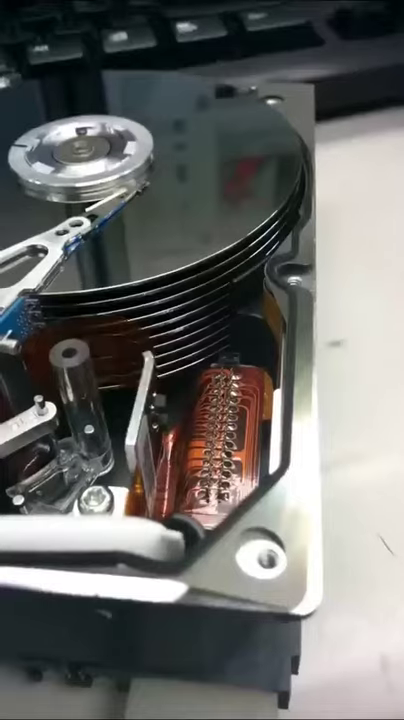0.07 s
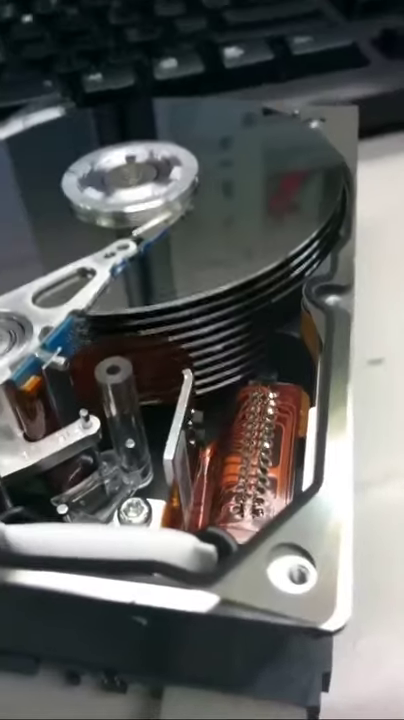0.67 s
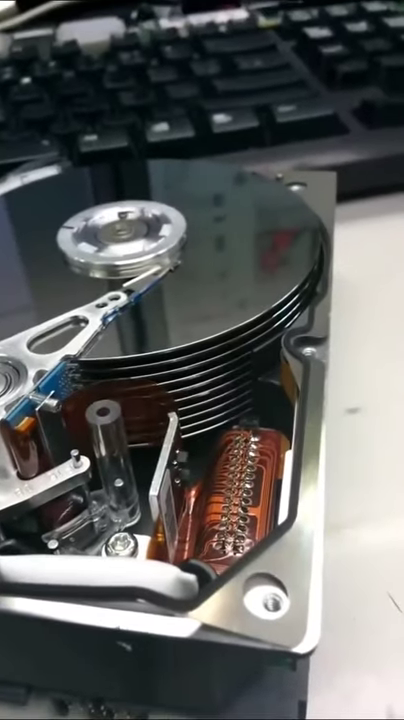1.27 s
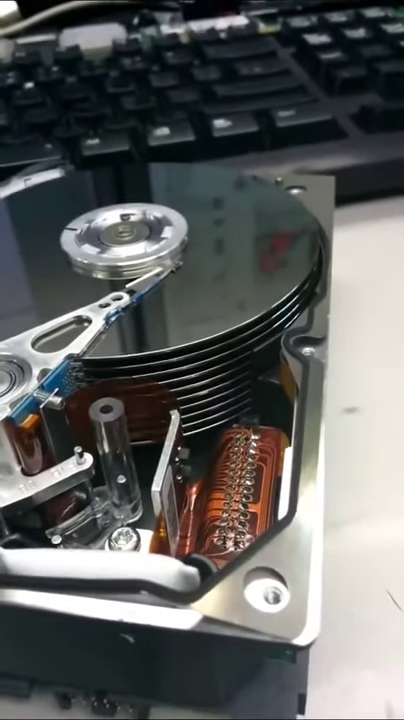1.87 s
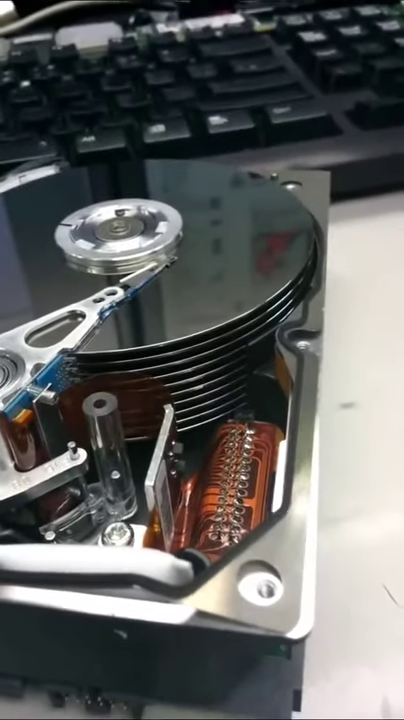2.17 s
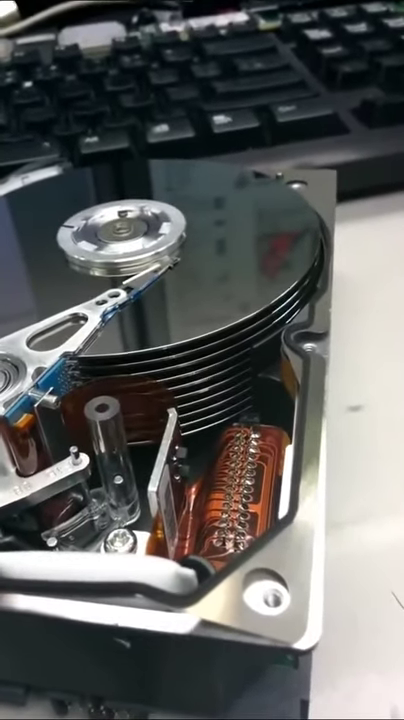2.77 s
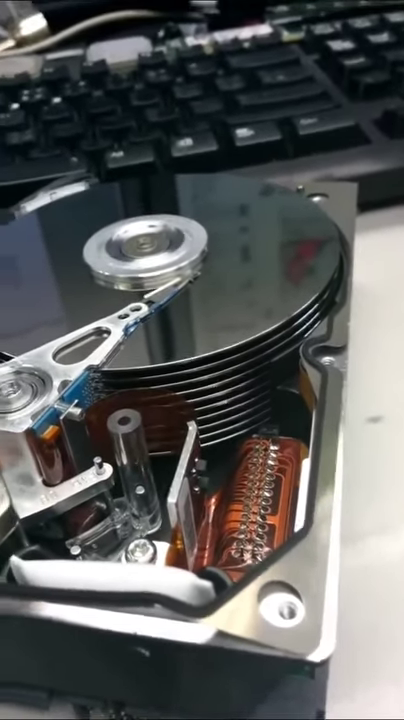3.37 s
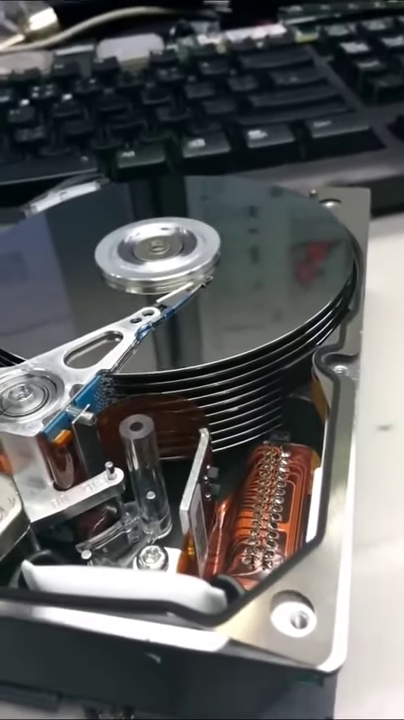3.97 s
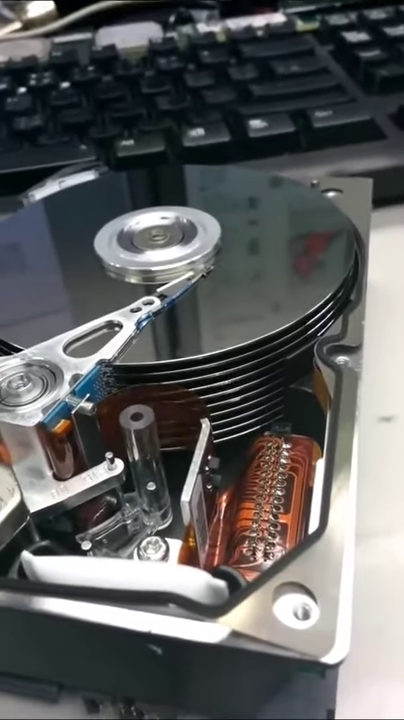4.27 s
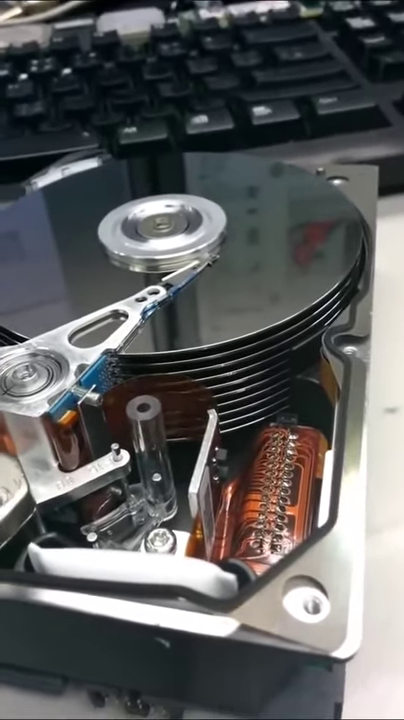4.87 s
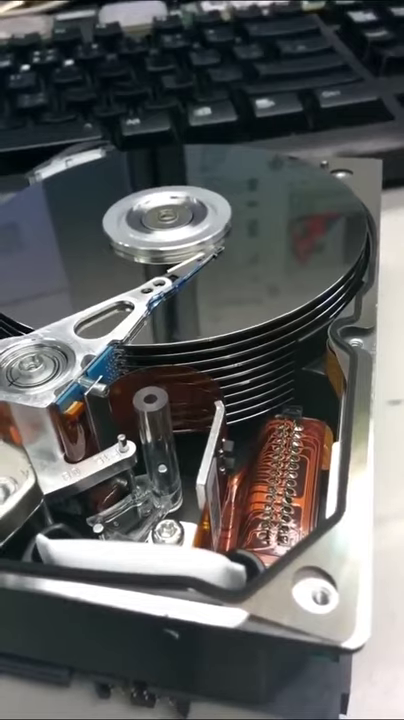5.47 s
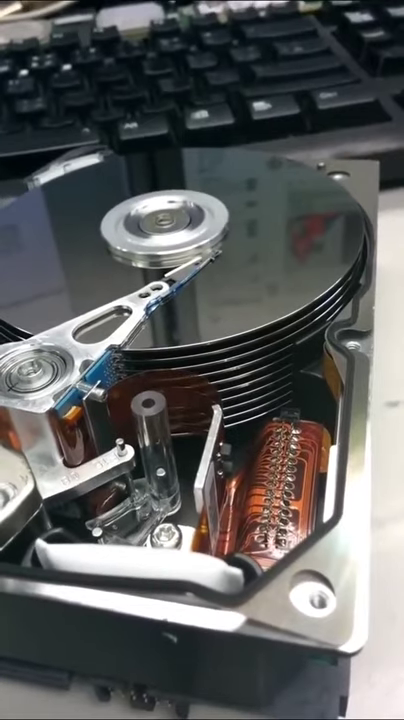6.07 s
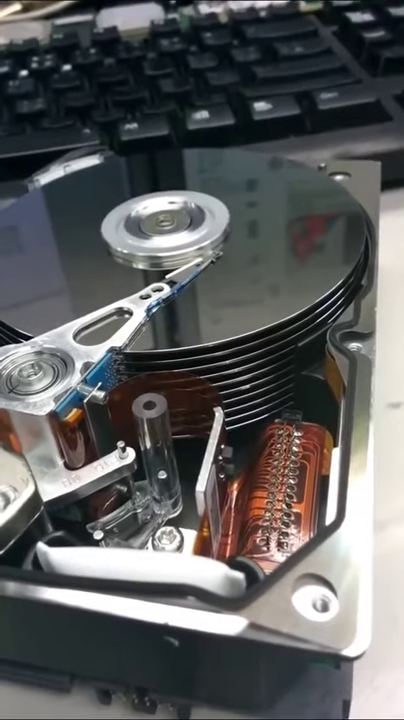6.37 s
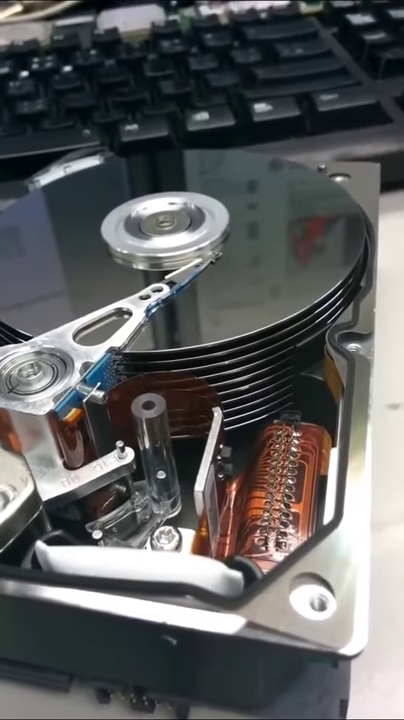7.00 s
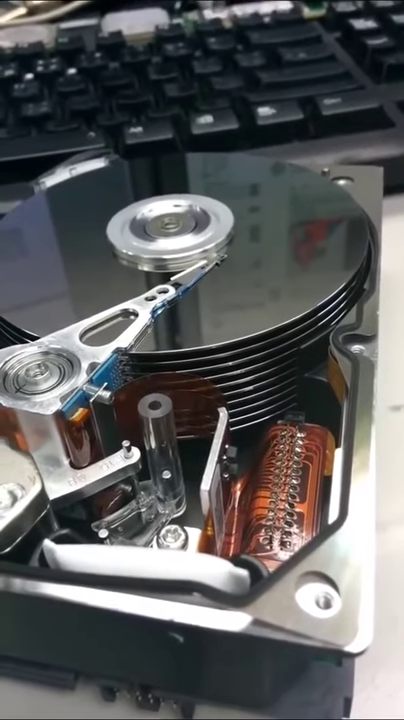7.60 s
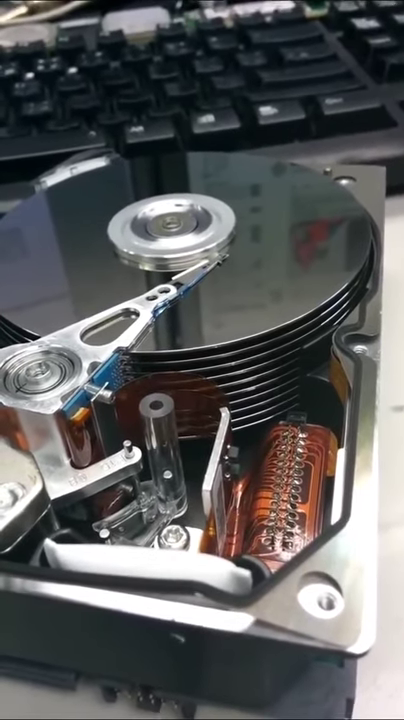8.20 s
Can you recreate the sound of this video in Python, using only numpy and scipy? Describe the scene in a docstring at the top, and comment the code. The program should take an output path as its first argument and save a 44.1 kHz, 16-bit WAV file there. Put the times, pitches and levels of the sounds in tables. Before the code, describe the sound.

A quiet office hums with low ventilation rumble and light hiss throughout. From about 0.5 seconds a hand makes faint rubs close by, with a few light clicks and one soft bump near 2.2 seconds. Just before 3 seconds an open hard drive on the desk gives a dry clack, and its motor starts stepping in quick, ringing pulses. The arm latch rattles briefly at about 3.4 seconds. The pulses speed up and run together into a rising whine, joined from 3.7 seconds by a thin, high sizzle, with one more click at 4.2 seconds. Bearing tones sing and swell into small pings around 4.7, 5.6 and 6.1 seconds. The whine keeps climbing, flaring on certain pitches, while a rush of air from the platters grows until the end at about 8 seconds.

```python
"""A humming office, close on a desk: an open hard drive spins up, in mono, after a little hand noise.
Jolts of current kick the motor; it steps, and its pulses run together into a whine that climbs through
the modes of platters and frame. The arm latch rattles free, the current chopper sizzles, flawed bearings
sing, a few tones swell into pings, and the platters stir more and more air."""
import sys
import numpy as np
from scipy import signal
from scipy.fft import rfft, irfft, next_fast_len
from scipy.io import wavfile
from scipy.ndimage import map_coordinates

SR = 44100
rng = np.random.default_rng(int(sys.argv[2]) if len(sys.argv) > 2 else 0)


def dump_mix(stems):
    """Bounce the given channels to the path in sys.argv[1] as a 16-bit WAV at rate SR."""
    frames = np.atleast_2d(stems).T  # one column per channel
    limited = np.clip(frames, -1, 1)  # hard clip at full scale
    pcm = np.round(limited * 32767).astype(np.int16)
    wavfile.write(sys.argv[1], SR, pcm)


N = 363384

# colour of the ventilation rumble: f/Hz, level/dB
VENT_COLOUR = [(20, -47), (32, -28), (50, -3), (75, -10), (110, -6.5), (250, -8), (400, -19.5), (620, -24),
               (850, -21), (1200, -26), (1700, -28), (2000, -28), (2900, -38), (5000, -61), (14000, -60)]
# colour of the office hiss: f/Hz, level/dB
HISS_COLOUR = [(1500, -25), (2800, -6.5), (3700, 1), (4000, 2), (4350, 2.5), (4800, -2), (5500, -1.5),
               (7400, -1), (9400, -5.5), (14000, -10)]
# mains and fan tones: f/Hz, level/dB
HUM_TONES = [(52, -46.5), (99.8, -40), (119.7, -43), (500.4, -61), (572.4, -61), (900.6, -55),
             (1327, -58.5), (1475, -59.5)]
# faint rubs of a hand: t/s, half length/s, level/dB
HAND_RUBS = [(.52, 0.059, -55), (0.805, 0.097, -47), (1.398, 0.036, -48), (1.866, .05, -52),
             (2.11, 0.058, -57), (2.96, 0.38, -49.5), (4.25, 0.55, -47.5)]
# small clicks of the hand: t/s, relative level/dB, t60/s, low-pass f/Hz
HAND_CLICKS = [(1.072, -34, .025, 6000), (2.0802, -31, .014, 14000), (2.1682, -23.5, 0.025, 14000),
               (2.195, -27.5, 0.027, 14000), (2.4306, -30.5, 0.14, 1200), (3.012, -39, .08, 14000)]
# colour of those rubs and clicks: f/Hz, level/dB
HAND_COLOUR = [(300, -10), (1500, 0.5), (4000, -1), (9000, 5.5), (13000, 1.5), (15000, -13)]
# jolts of chopped current that align the rotor, and one late misstep: t/s, relative level/dB
CURRENT_JOLTS = [(2.9505, 8), (2.953, 16), (2.9545, 12), (2.9593, 17.5), (2.962, 11), (2.9633, 11),
                 (4.2023, 15.5)]
# modes of platters and frame: f/Hz, width/Hz, level/dB
BODY_MODES = [(661, 46, -8.5), (1150, 55, -2.3), (1260, 45, -7.5), (2210, 40, -12), (2307, 70, -11.5),
              (2600, 120, -7), (2674, 92, 2.1), (2792, 110, -7.5), (3080, 330, -11), (3222, 90, -7.2),
              (3494, 186, -27), (3760, 120, -24), (4330, 110, -17.5), (4537, 45, -15), (4735, 55, -11.5),
              (5460, 240, -24), (6785, 780, -30), (7884, 1080, -32)]
# commutation slips behind the rotor just before the misstep: t/s, lag/steps
STEP_LAG = [(3.96, 0), (4.2, 1)]
# contacts of the arm latch: t/s, relative level/dB
LATCH_HITS = [(3.38, -6), (3.388, -0.5), (3.398, -1.5), (3.406, -7), (3.419, -7)]
# modes of the latch: f/Hz, width/Hz, level/dB
LATCH_RING = [(650, 400, -1.5), (1000, 200, 0), (4305, 170, 10.5), (7000, 350, -2), (8350, 500, -6),
              (10000, 900, -10), (11950, 600, -6)]
# high modes of the motor: f/Hz, width/Hz, level/dB
STATOR_MODES = [(10230, 280, 2.3), (10620, 260, -6), (11412, 60, 3), (11420, 350, -6), (12000, 600, -5.5),
                (12365, 70, 1), (12550, 380, 0), (13400, 800, -10.5)]
# bearing flaws on outer race, inner race and a ball: hits per turn, {harmonic: lift/dB}
BEARING_FLAWS = [(2.598, {12: 6, 14: 8, 15: 6, 16: 7, 18: 4, 19: 5, 21: 3}),
                 (4.404, {7: 7, 9: 6, 10: 10, 12: 6, 15: 4, 17: 6, 18: 3, 20: 6, 21: 6, 26: 5, 28: 5}),
                 (3.536, {12: 14, 16: 6, 18: 5, 19: 5, 29: 9})]
# each flaw's harmonics: relative level/dB
FLAW_LEVELS = [-41.5, -41.5, -45]
# moments when the bearing tones ease off: t/s, half length/s, dip/dB
BEARING_LULLS = [(4.78, .03, -9), (6.16, .03, -8), (6.52, .045, -8)]
# partials of the magnetic whine: multiple of the commutation rate, relative level/dB
WHINE_PARTIALS = [(1, -24.5), (2, -25), (3, -21.2), (4, -26), (13 / 3, -36.5), (14 / 3, -39), (5, -32),
                  (16 / 3, -38), (17 / 3, -40), (6, -33), (7, -39)]
# sharp hub modes that the whine glides through: f/Hz, width/Hz, level/dB
HUB_MODES = [(661, 50, -18), (1145, 42, -8), (1245, 40, -16), (1390, 70, -21), (2030, 70, -20),
             (2210, 50, -20), (2674, 84, 1), (2580, 150, -14), (2800, 110, -12), (3000, 300, -24),
             (3216, 62, -6), (3500, 160, -22), (4110, 50, -8), (4345, 70, -7), (4555, 55, -4.5),
             (4715, 60, -6), (5200, 350, -17), (5500, 130, -9), (6520, 300, -22)]
# colour of the air rushing round the platters: f/Hz, level/dB
AIR_COLOUR = [(300, -4), (480, -10), (700, 0), (950, -4.5), (1200, 0.5), (1600, -13), (2200, -0.5),
              (2620, 1), (3000, -7), (3450, -6.5), (4500, -7), (5700, -14), (6500, -7.5), (7100, -12),
              (8000, -7.5), (9200, -15.5), (10400, -11.5), (12400, -17), (14000, -28)]
# bearing tones that swell into pings: t/s, half length/s, level/dB
PING_SWELLS = [(4.68, 0.012, -27), (5.595, 0.022, -27.5), (6.09, 0.023, -24)]

SPIN_S = 3.042  # the rotor sets off
FREE_RATE = 1993.6  # commutations/s at which back-voltage would cancel the supply


def amp(db):
    """Decibels to gain."""
    return np.exp(np.asarray(db) * np.log(10) / 20)


def unit(x):
    """Scale to rms 1."""
    return x / np.sqrt(np.mean(x ** 2) + 1e-20)


def clock():
    """The time of each sample."""
    return np.arange(N) / SR


def wobble(rate, size=8):
    """A smooth random curve, rate knots a second."""
    knots = rng.standard_normal(int(N * rate / SR) + 4)
    at = np.arange(len(knots) * size) / size
    return np.interp(clock() * rate, at, map_coordinates(knots, [at]))


def filtered(x, response):
    """EQ x with a response given as a function of frequency."""
    size = next_fast_len(N + SR // 2)
    return irfft(rfft(x, size) * response(np.fft.rfftfreq(size, 1 / SR)), size)[:N]


def noise(colour):
    """Noise of rms 1 in the given colour."""
    hz, db = np.transpose(colour)
    white = rng.standard_normal(N)
    return unit(filtered(white, lambda f: amp(np.interp(np.log(f + 1), np.log(hz + 1), db))))


def ring(x, modes, size=16384):
    """x through a bank of steep-sided resonances that ring on after each blow."""
    f = np.fft.rfftfreq(size, 1 / SR)
    power = sum(amp(db) ** 2 / (1 + (2 * (f - hz) / width) ** 2) ** (3 / 2) for hz, width, db in modes)
    fold = np.r_[1, np.full(size // 2 - 1, 2), np.zeros(size // 2)]  # minimum phase: no pre-ring
    cepstrum = irfft(np.log(power) / 2) * fold
    return signal.oaconvolve(x, irfft(np.exp(rfft(cepstrum))))[:N]


def decay(s, t60):
    """An envelope that starts at s and dies away."""
    age = clock() - s
    return (age >= 0) * amp(-60 * np.clip(age / t60, 0, 5))


def swell(s, length):
    """A smooth swell of height 1 around s."""
    return np.exp(-((clock() - s) / length) ** 2)


def overtones(cycles, lifts, count=40, size=4096):
    """A wavetable of equal harmonics in random phases, with a chosen few lifted."""
    k = np.arange(count)
    lines = (k > 0) * amp([lifts.get(n, 0) for n in k]) * np.exp(2j * np.pi * rng.random(count))
    return np.interp(cycles % 1 * size, np.arange(size), irfft(lines, size) * size / 2)


def office(rumble_db=-33.5, hiss_db=-46.0, drift_rad=0.86, flicker_db=1.5):
    """The bed: steady ventilation rumble and slightly restless hiss, with mains and fan tones."""
    hum = sum(amp(db) * np.sqrt(2) * np.sin(2 * np.pi * hz * clock() + drift_rad * wobble(4))
              for hz, db in HUM_TONES)
    rumble = amp(rumble_db) * noise(VENT_COLOUR)
    hiss = amp(hiss_db + flicker_db * wobble(14)) * noise(HISS_COLOUR)
    return rumble + hiss + hum


def handling(click_db=-4, bump_db=-18, bump_hz=85, bump_s=2.202):
    """Close hand noise: faint rubs, a few light clicks, bright or dull, and one soft bump."""
    scrape = noise(HAND_COLOUR)
    clicks = sum(amp(db) * decay(s, t60) * unit(signal.lfilter(*signal.butter(1, hz, fs=SR), scrape))
                 for s, db, t60, hz in HAND_CLICKS)
    rubs = scrape * sum(amp(db) / (1 + ((clock() - s) / length) ** 2) for s, length, db in HAND_RUBS)
    bump = -np.sin(2 * np.pi * bump_hz * (clock() - bump_s)) * decay(bump_s, t60=0.13)
    return amp(click_db) * clicks + rubs + amp(bump_db) * bump


def jolts(chop_hz=2850, half_length_s=0.00017):
    """Each jolt is a tiny squeak of chopped current."""
    t = np.arange(-SR // 500, SR // 500) / SR
    window = np.exp(-(t / half_length_s) ** 2)
    squeak = 2 * window / window.sum() * np.cos(2 * np.pi * chop_hz * t)
    push = np.zeros(N)
    for s, db in CURRENT_JOLTS:
        push[round(s * SR)] += amp(db)
    return np.convolve(push, squeak, "same")


def kick(gain_db=-24, band_hz=(2500, 5500)):
    """The jolts heard straight from the coils, as a dry clack."""
    return amp(gain_db) * signal.lfilter(*signal.butter(2, band_hz, "band", fs=SR), jolts())


def rotor(time_constant_s=6.013, drag_per_s2=111.4, worst_rate=71, drag_span=169.1):
    """Spin-up against back-voltage and head drag: commutations/s, their count, seconds off the nearest."""
    rates = np.linspace(0, FREE_RATE, N, endpoint=False)
    head_drag = drag_per_s2 * np.exp(-((rates - worst_rate) / drag_span) ** 2)  # gone once the heads fly
    acceleration = (FREE_RATE - rates) / time_constant_s - head_drag
    reached_s = SPIN_S + np.cumsum(rates[1] / acceleration)
    rate = np.interp(clock(), reached_s, rates)
    count = np.cumsum(rate) / SR - .021  # at rest just short of the first step
    return rate, count, (count - np.round(count)) / (rate + 1e-6)


def handover(start_s=3.705, length_s=0.076):
    """The controller's crossfade: 0 on the starting current, 1 on the running current."""
    return np.clip((clock() - start_s) / length_s, 0, 1)


def current(rate, start_db=7.5, rise_db_per_s=8, run_db=4.8, sag_power=2.4):
    """Coil drive pushes ever harder, then hands over to a gentler level; back-voltage eats into both."""
    latch_dip_db = 4 * swell(3.45, 0.044)  # as the latch lets go
    push_db = start_db + rise_db_per_s * (clock() - SPIN_S) - latch_dip_db
    return amp(push_db + handover() * (run_db - push_db)) * (1 - rate / FREE_RATE) ** sag_power


def motor(rate, count, uneven_db=1.5, scatter_s=1.4e-5):
    """Slightly uneven commutation pulses, the jolts and the bearings all shake platters and frame."""
    steps = count - np.interp(clock(), *np.transpose(STEP_LAG))
    nearest = np.round(steps).astype(int)
    slip, accent = rng.standard_normal((nearest.max() + 1, 2))[nearest].T
    late_s = (steps - nearest) / (rate + 1e-6) + scatter_s * slip
    ticks = np.sinc(late_s * SR) * np.exp(-(late_s * SR / 8) ** 2)  # band-limited impulses
    pulses = ticks * current(rate) * amp(uneven_db * accent)
    return ring(pulses + jolts() + bearings(rate, count), BODY_MODES)


def latch(ring_db=-18.0, crack_db=-26):
    """The arm latch chatters as it lets go; each contact starts with a bright crack."""
    contacts = sum(amp(db) * decay(s, t60=.05) for s, db in LATCH_HITS)
    cracks = sum(amp(db) * decay(s, t60=.008) for s, db in LATCH_HITS)
    rattle = ring(contacts * rng.standard_normal(N), LATCH_RING)
    return amp(ring_db) * rattle + amp(crack_db) * cracks * rng.standard_normal(N)


def chopper(rate, count, offset_s, gain_db=-28.5, spray_db=-1, fade_db_per_octave=1.5):
    """Sizzle: a sideband of the ultrasonic current switching slides down through the stator's modes."""
    switch_hz, sideband, jitter_rad = 20000, 14, .65
    burst_s, loudest_rate = 0.00028, 560
    falling = np.cos(2 * np.pi * (switch_hz * clock() - sideband * count) + jitter_rad * wobble(380))
    # the share that restarts at each commutation gives rising lines instead
    rising = np.cos(2 * np.pi * (switch_hz - sideband * rate) * offset_s + jitter_rad * wobble(250))
    smear = 1 + .7 * wobble(1500)  # uneven switching blurs the sideband into a narrow hiss
    spray = amp(spray_db) * rng.standard_normal(N)
    bursts = np.exp(-(offset_s / burst_s) ** 2) * (falling * smear + rising + spray)
    octaves = np.abs(np.log2(rate / loudest_rate + 1e-6))
    return amp(gain_db - fade_db_per_octave * octaves) * handover() * ring(bursts, STATOR_MODES)


def bearings(rate, count, grind_db=-25, waver_db=2, low_cut_hz=1900, loudest_rate=820, fall_db=4):
    """Flaws struck a set number of times a turn sing over rolling noise; both peak at middle speed."""
    turns = count / 12  # commutations per turn
    tones = sum(amp(db + waver_db * wobble(10)) * overtones(hits * turns, lifts)
                for (hits, lifts), db in zip(BEARING_FLAWS, FLAW_LEVELS))
    # the hits are too sharp to stir the low modes
    tones = signal.sosfilt(signal.butter(2, low_cut_hz, "high", fs=SR, output="sos"), tones)
    lull_db = sum(db * swell(s, length) for s, length, db in BEARING_LULLS)
    grind = amp(grind_db) * rng.standard_normal(N)
    octaves = np.log2(rate / loudest_rate + 1e-6)
    return amp(-fall_db * octaves ** 2) * (amp(lull_db) * tones + grind)


def magnet_whine(rate, count, db_per_decade=35, unity_rate=1000):
    """The magnets' whine grows with speed and flares wherever it crosses a hub mode."""
    tones = np.zeros(N)
    for multiple, db in WHINE_PARTIALS:
        flutter_db = 1.3 if db > -30 else 3  # weak partials flutter most
        tones += amp(db + flutter_db * wobble(16)) * np.cos(2 * np.pi * multiple * count)
    return ring(amp(db_per_decade * np.log10(rate / unity_rate + 1e-6)) * tones, HUB_MODES)


def pings(rate, count, mode_hz=2678):
    """Bearing tones glide with the rotor, each tuned to cross a platter mode at the top of its swell."""
    return sum(amp(db) * swell(s, length)
               * np.sin(2 * np.pi * mode_hz * count / np.interp(s, clock(), rate))
               for s, length, db in PING_SWELLS)


def windage(rate, level_db=-27.0, at_rate=1100, db_per_decade=50, flutter_db=.5):
    """The rush of air dragged round by the platters grows as a power of their speed."""
    speed_db = db_per_decade * np.log10(rate / at_rate + 1e-6)
    return amp(level_db + speed_db + flutter_db * wobble(16)) * noise(AIR_COLOUR)


def desk_echoes(x, wet_db=-18, predelay_s=.0037, t60=.14):
    """Faint echoes from desk and walls make the gliding tones glint."""
    tail = rng.standard_normal(SR // 4) * decay(predelay_s, t60)[:SR // 4]
    return x + amp(wet_db) * signal.fftconvolve(x, tail / np.linalg.norm(tail))[:N]


def scene():
    """The mono mix: the drive and its echoes over hand noise and the office bed."""
    rate, count, offset_s = rotor()
    drive = (kick() + motor(rate, count) + pings(rate, count) + magnet_whine(rate, count)
             + chopper(rate, count, offset_s) + windage(rate) + latch())
    mono = desk_echoes(drive) + handling() + office()
    return np.array([mono, mono])


def record(dry, open_s=0.196, fade_s=0.015, top_hz=14000):
    """A beat of silence, a quick fade in and a brick-wall cut on the top end."""
    fade_in = np.clip((clock() - open_s) / fade_s, 0, 1)
    return np.array([filtered(side * fade_in, lambda hz: hz < top_hz) for side in dry])


dry = scene()
out = record(dry)
dump_mix(out)
```